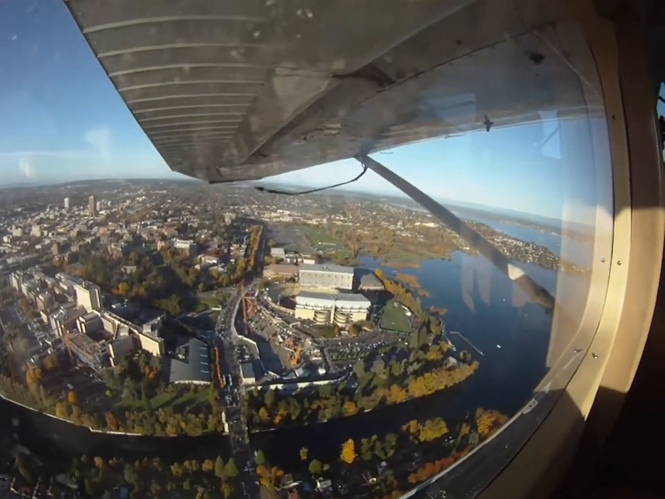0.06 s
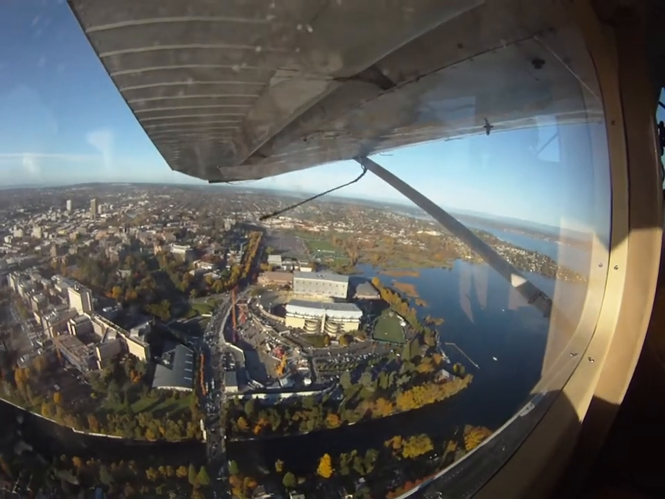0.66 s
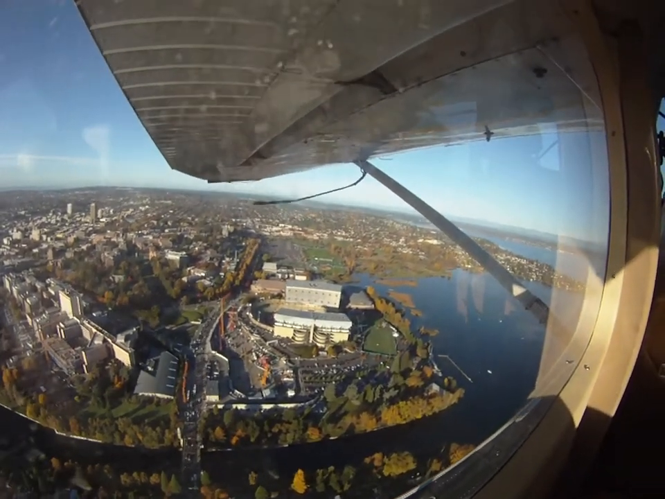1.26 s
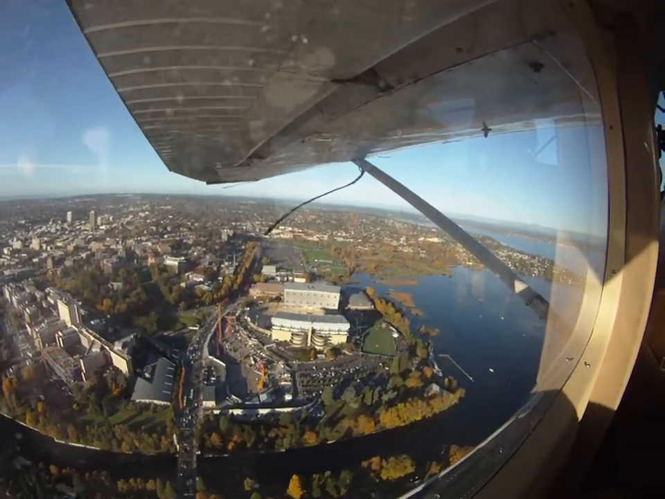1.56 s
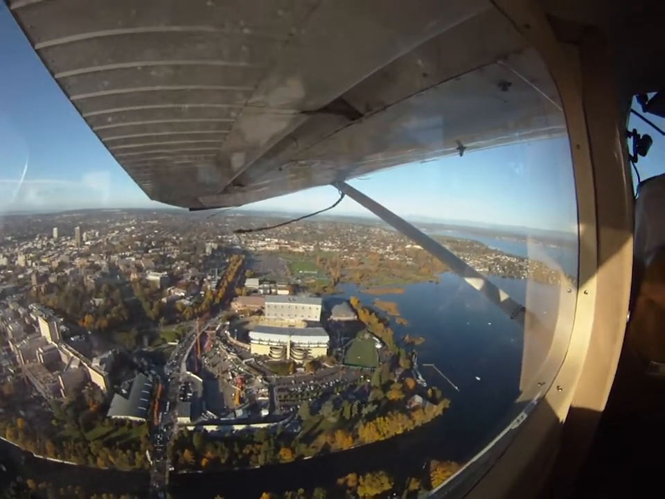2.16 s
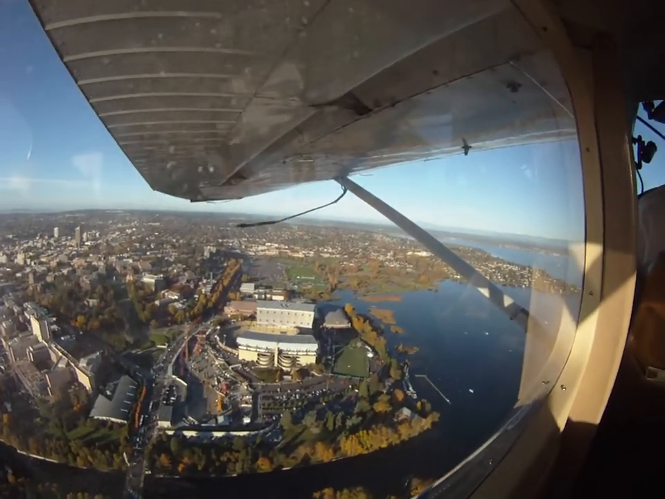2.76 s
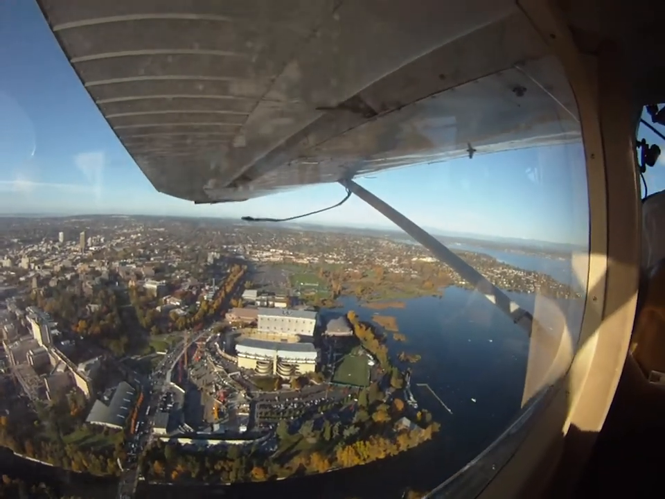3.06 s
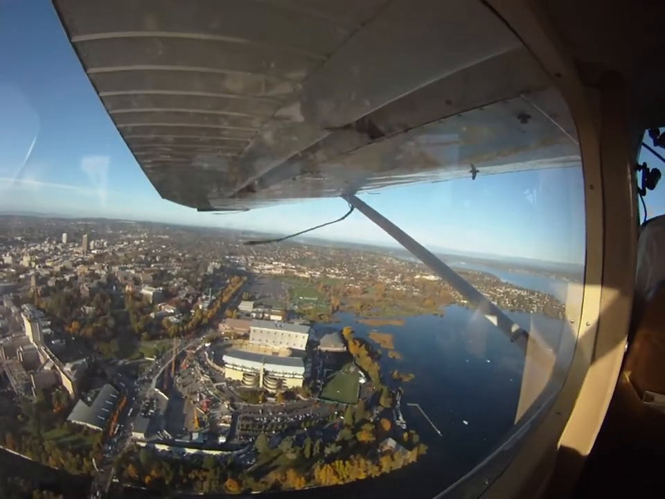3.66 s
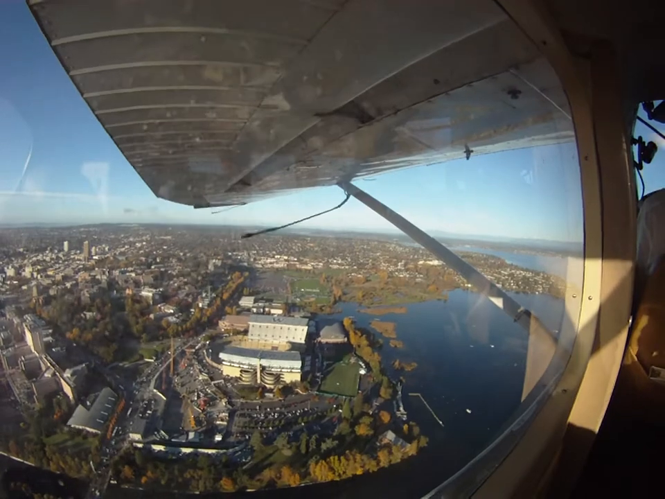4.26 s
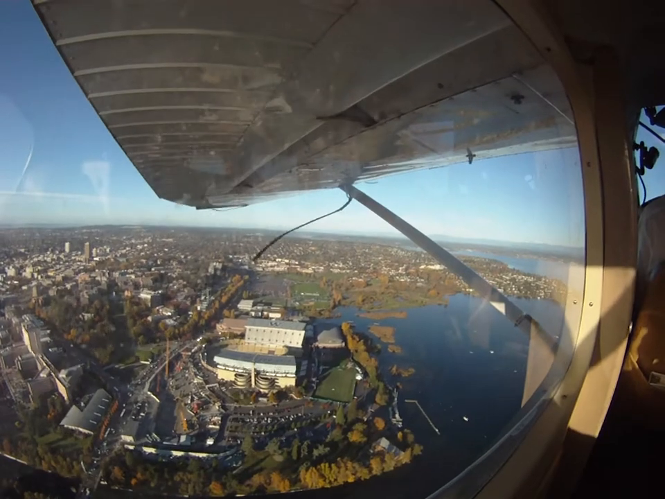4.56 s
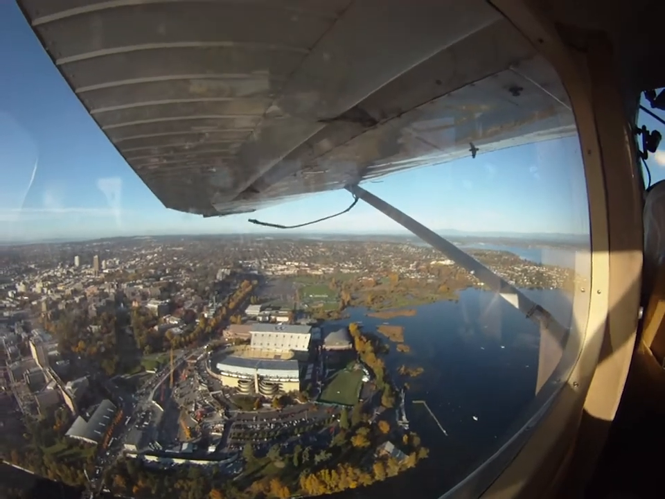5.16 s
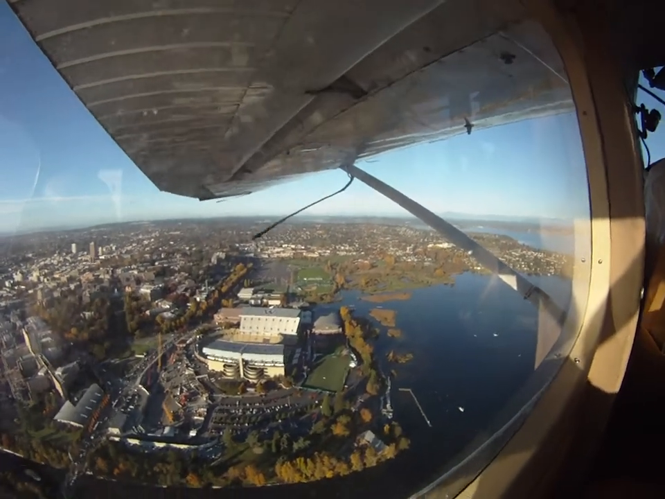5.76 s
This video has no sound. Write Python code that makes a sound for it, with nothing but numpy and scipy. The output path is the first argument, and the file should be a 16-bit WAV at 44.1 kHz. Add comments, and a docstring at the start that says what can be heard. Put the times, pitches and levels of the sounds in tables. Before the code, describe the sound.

Inside a light aircraft in flight, a deep engine and propeller drone runs under rushing air, easing slightly about four seconds in.

```python
"""Four-cylinder engine and propeller of a small plane, droning in the cabin in flight; easing near 4 s.
Exhaust rumbles, panels roar, the slipstream hisses along the window; one airflow drives all three.
A faint whine and a breathy note from the window seal stand above them.
Near 2 s the plane's angle to the air shifts: hiss and drone change colour.
The nearly mono camera adds a thin buzz in the high treble."""
import sys
import numpy as np
from scipy import signal
from scipy.fft import rfft, irfft, next_fast_len
from scipy.io import wavfile
from scipy.ndimage import uniform_filter1d, map_coordinates

SR = 44100
rng = np.random.default_rng(int(sys.argv[2]) if len(sys.argv) > 2 else 0)


def store_wav(level_fs):
    """Save 16-bit WAV to argv[1]."""
    pcm = np.round(np.clip(np.atleast_2d(level_fs), -1, 1) * 32767)
    wavfile.write(sys.argv[1], SR, pcm.T.astype(np.int16))


N = 265041
T = np.arange(N) / SR

# airflow round the cabin, used relative to its mean: t/s, level/dB
AIRFLOW_DB = [(0, -38.5), (0.45, -39), (0.9, -38), (1.9, -38.9), (2.8, -41), (3.5, -39.5), (4.1, -38),
              (4.9, -39), (5.7, -38.5), (6, -38.5)]
# noise spectra, shape only: f/Hz, level/dB
SKIN_SPECTRUM_DB = [(500, -8), (1200, -2.5), (2000, -4.5), (2400, 1.5), (3000, 1), (3600, -4), (4500, -6.5),
                    (5600, -7.5), (7400, -11), (9000, -10), (10200, -16.5), (13800, -29), (15000, -16)]
GAP_SPECTRUM_DB = [(800, -16), (1700, 0.5), (2050, 5), (2700, -11), (3400, -1.5), (4300, 2), (5200, -3),
                   (6500, -4.5), (7600, -3.5), (8800, -12), (11500, -15), (13800, -22), (15000, -15)]
PANEL_SPECTRUM_DB = [(300, -34), (550, -10.5), (700, -1), (900, 1.5), (990, -3.5), (1120, -3.5),
                     (1200, -9.5), (1400, -7), (1700, -13), (2400, -18), (5000, -50)]
EXHAUST_SPECTRUM_DB = [(12, -32), (22, -12), (45, -4), (65, 0.5), (105, -2), (140, -1.5), (200, -3.5),
                       (280, -8), (370, -8), (470, -12), (560, -12), (700, -22), (1200, -53.5)]
SIDE_SPECTRUM_DB = [(30, -4), (150, 11.5), (600, -6.5), (2500, -20.5), (5000, -34), (8000, -36),
                    (12000, -55)]
# whine ringing out: t/s, length/s, peak rms level/dB
WHINE_RINGS = [(0.669, 0.16, -43), (1.8, .2, -45), (3.78, .5, -46.5), (5.68, 0.19, -37.5)]
# engine firing rate: t/s, f/Hz
FIRING_HZ = [(0, 81.94), (0.4, 82.04), (1.1, 82.35), (2.4, 82.13), (3.2, 82.66), (3.75, 82.12),
             (4.05, 80.63), (4.5, 79.78), (5.1, 79.43), (6, 79.63)]
# boom, order 2 of the firing rate: t/s, rms level/dB
BOOM_DB = [(0, -30.5), (0.5, -26), (1.7, -24), (3.3, -24.5), (3.85, -22), (4.15, -26.5), (5.1, -25.5),
           (5.8, -23)]
# swell of the growl: t/s, level/dB
SWELL_DB = [(0, -0.5), (.95, -1), (1.25, 3.5), (1.9, -.5), (3.45, -2.5), (3.8, 3), (4.15, 6.5), (4.5, 1.5),
            (6, -1)]
# growl: order, rms level/dB, swell gain/(dB/dB), slowdown gain/(dB/Hz), angle-shift gain/dB
GROWL_ORDERS = [(3, -36, 1.1, .9, -6), (4, -39.5, .9, 2.1, -0.5), (5, -46, 0.3, -1.5, 6.5)]
# weak engine tones: order, rms level/dB
WEAK_ORDERS = [(.25, -51), (.5, -35.5), (.75, -41), (1.25, -37.5), (1.5, -40.5), (1.75, -41), (2.25, -42.5),
               (3.75, -48), (4.25, -44.5), (5.75, -52.5), (6, -51), (7, -52), (8, -56.5), (11, -59),
               (13, -59), (13.5, -56.5), (13.75, -61)]


def amp(db):
    """dB to gain."""
    return 10 ** (np.asarray(db) / 20)


def unit(x):
    """Scale to rms 1."""
    return x / np.sqrt(np.mean(x ** 2) + 1e-20)


def curve(rows):
    """Time table to one value per sample."""
    return np.interp(T, *np.transpose(rows))


def wobble(rate_hz):
    """Smooth random curve, rate_hz knots per second."""
    return map_coordinates(rng.standard_normal(int(N * rate_hz / SR) + 4), [T * rate_hz])


def filtered(x, response):
    """Apply a frequency response."""
    size = next_fast_len(N + SR // 2)
    return irfft(rfft(x, size) * response(np.fft.rfftfreq(size, 1 / SR)), size)[..., :N]


def turbulence(spectrum, patchy_db):
    """Shaped noise with patches of random gain, rms 1."""
    bins = signal.stft(rng.standard_normal(N), nperseg=1024)[2]
    patches = uniform_filter1d(rng.standard_normal(bins.shape), size=6, axis=0)
    patches = unit(uniform_filter1d(patches, size=12, axis=1))
    noise = signal.istft(bins * amp(patchy_db * patches), nperseg=1024)[1][:N]
    f_hz, db = np.transpose(spectrum)
    return unit(filtered(noise, lambda hz: amp(np.interp(np.log(hz + 1), np.log(f_hz), db))))


def narrowband(pitch_hz, width_hz):
    """Noise round a pitch, rms 1."""
    carrier = np.exp(2j * np.pi * np.cumsum(pitch_hz) / SR)
    return unit(np.real(carrier * (wobble(width_hz) + 1j * wobble(width_hz))))


def tone(cycles):
    """Cosine, rms 1."""
    return np.sqrt(2) * np.cos(2 * np.pi * cycles)


def airflow_gain(base_db, db_per_db):
    """Gain of a noise layer, following the airflow."""
    flow_db = curve(AIRFLOW_DB)
    return amp(base_db + db_per_db * (flow_db - flow_db.mean()))


def angle_shift(mid_s=2.05, length_s=0.56):
    """Ramp 0 to 1 as the plane's angle to the air changes."""
    return np.clip(0.5 + (T - mid_s) / length_s, 0, 1)


def window_seal(start_hz=1538, drop_hz=60):
    """Air sings past the seal; the note sinks and fades as the draught moves away."""
    shift = angle_shift()
    return amp(-50.3 - 5.5 * shift) * narrowband(start_hz - drop_hz * shift, width_hz=70)


def whine(pitch_hz=710):
    """Fuzzy steady pitch, as of an instrument gyro; rings out clearer at times."""
    fuzz = amp(-49) * narrowband(np.full(N, pitch_hz), width_hz=12)
    ring = sum(amp(db) * np.exp(-(2 * (T - at_s) / length_s) ** 2) for at_s, length_s, db in WHINE_RINGS)
    return fuzz + ring * np.sqrt(2) * np.sin(2 * np.pi * pitch_hz * T + 0.5 * wobble(14))


def slipstream(firings):
    """Air rushes over the skin and hisses through a window gap; both flutter and pulse per blade."""
    pulse = 1 + 0.055 * np.cos(2 * np.pi * firings)
    flutter = amp(0.47 * wobble(21.9))
    skin = airflow_gain(-47.5, db_per_db=0.98) * amp(2.2 * angle_shift())
    skin *= turbulence(SKIN_SPECTRUM_DB, patchy_db=0.85)
    gap = airflow_gain(-47.5, db_per_db=1.05) * amp(-2 * angle_shift() + 0.77 * wobble(25))
    gap *= turbulence(GAP_SPECTRUM_DB, patchy_db=1.0)
    return pulse * flutter * (skin + gap)


def panel_roar(firings):
    """Cabin panels roar in the airflow, chopped by each blade."""
    chop = 1 + 0.06 * np.cos(2 * np.pi * firings) + 0.04 * np.cos(4 * np.pi * firings)
    gain = airflow_gain(-39.4, db_per_db=1.2) * amp(-0.6 * angle_shift())
    return gain * chop * turbulence(PANEL_SPECTRUM_DB, patchy_db=1.1)


def exhaust_rumble(firings):
    """Exhaust throbs once per four-firing engine cycle and swells with the growl."""
    throb = 1 + 0.18 * np.cos(2 * np.pi * firings / 4)
    gain = airflow_gain(-28.5, db_per_db=0.8) * amp(0.12 * curve(SWELL_DB))
    return gain * unit(throb * turbulence(EXHAUST_SPECTRUM_DB, patchy_db=1.0))


def growl(firings, slowdown_hz, waver_db=1.3):
    """Orders 3-5 swell together, each coloured by engine speed and the angle shift."""
    swell_db = curve(SWELL_DB)
    total = np.zeros(N)
    for order, base_db, db_per_db, db_per_hz, shift_db in GROWL_ORDERS:
        level_db = base_db + db_per_db * swell_db + db_per_hz * slowdown_hz + shift_db * angle_shift()
        level_db += waver_db * wobble(4)
        total += amp(level_db) * tone(order * firings + rng.random() + 0.03 * wobble(8))
    return total


def engine(firings, rate_hz):
    """Exhaust pulses and blade passes share one rate; unequal cylinders add the orders between."""
    slowdown_hz = rate_hz.max() - rate_hz
    fundamental = amp(-15.5 + 0.11 * wobble(12)) * tone(firings)
    lead_cycles = 0.16 + 0.05 * slowdown_hz  # the cabin turns the boom's phase as speed drops
    boom = amp(curve(BOOM_DB) + 0.23 * wobble(24.98)) * tone(2 * firings + lead_cycles)
    # uneven burns: level and phase waver
    weak = sum(amp(db + 2.7 * wobble(7)) * tone(order * firings + rng.random() + 0.062 * wobble(6))
               for order, db in WEAK_ORDERS)
    return fundamental + boom + growl(firings, slowdown_hz) + weak


def scene(dip_s=4.347, dip_db=-3, recovery_s=0.049):
    """All sources centred, with a very faint, patchy stereo width; the level dips once, briefly."""
    rate_hz = curve(FIRING_HZ)
    firings = np.cumsum(rate_hz) / SR
    mid = engine(firings, rate_hz) + exhaust_rumble(firings) + panel_roar(firings)
    mid += slipstream(firings) + whine() + window_seal()
    side = amp(-58) * turbulence(SIDE_SPECTRUM_DB, patchy_db=4.0)
    dip = amp(dip_db * (T > dip_s) * np.exp(-np.abs(T - dip_s) / recovery_s))
    return dip * np.array([mid + side, mid - side])


def record(dry, notch_hz=6000, jitter_hz=12000, cutoff_hz=15300):
    """Camera: treble notch, low-pass; uneven sample timing mirrors the drone round jitter_hz."""
    notched = filtered(dry, lambda hz: amp(-12 * np.exp(-((hz - notch_hz) / 330) ** 2)))
    slope = filtered(np.gradient(notched, axis=1), lambda hz: 1 / np.sqrt(1 + (hz / 2600) ** 4))
    jitter_samples = 1.25 * np.sin(2 * np.pi * jitter_hz * T)
    buzz = slope * jitter_samples
    return filtered(notched + buzz, lambda hz: hz < cutoff_hz)


dry = scene()
out = record(dry)
store_wav(out)
```